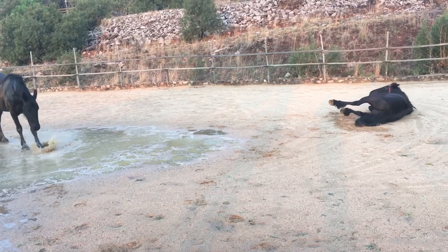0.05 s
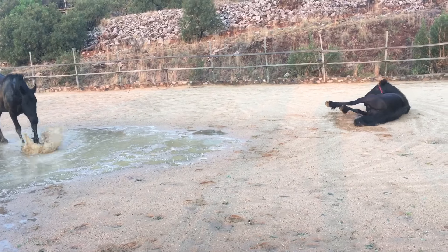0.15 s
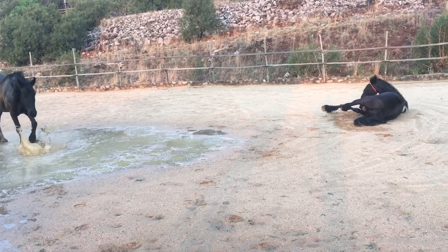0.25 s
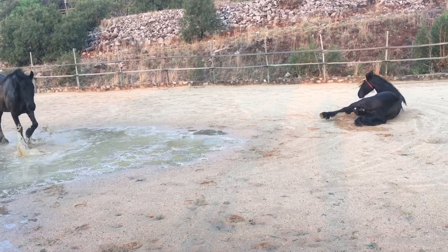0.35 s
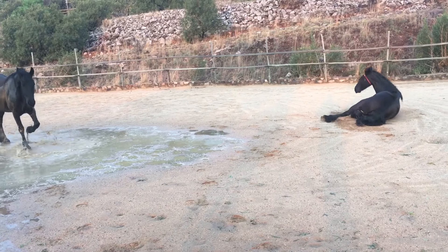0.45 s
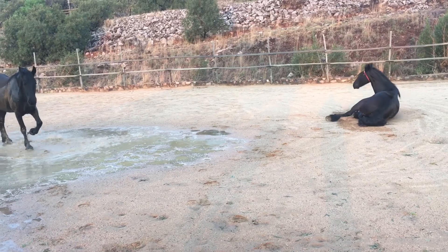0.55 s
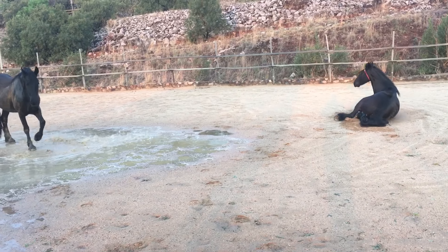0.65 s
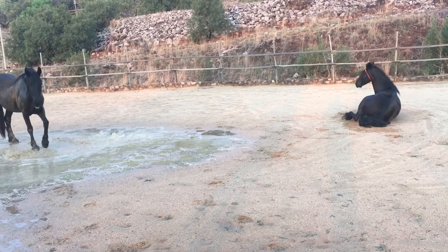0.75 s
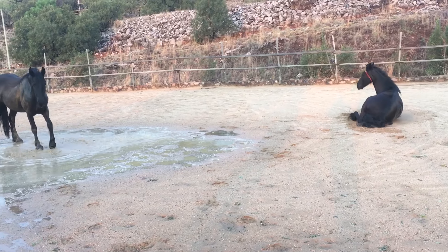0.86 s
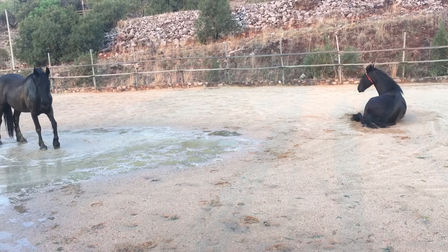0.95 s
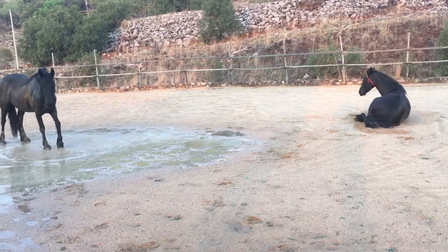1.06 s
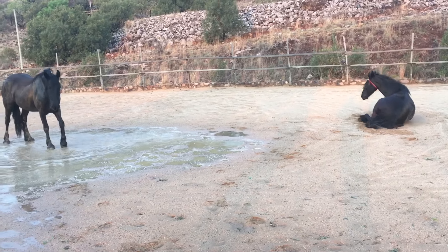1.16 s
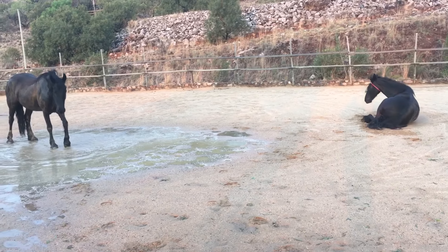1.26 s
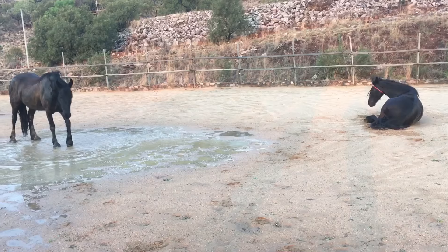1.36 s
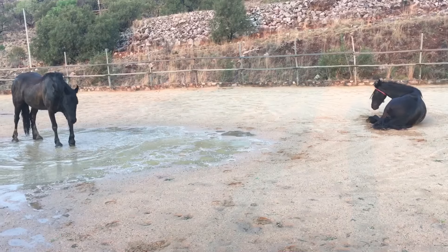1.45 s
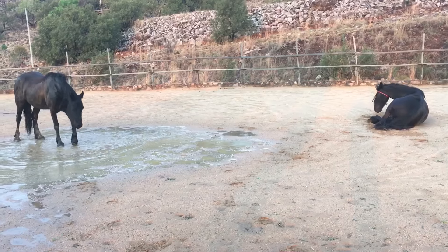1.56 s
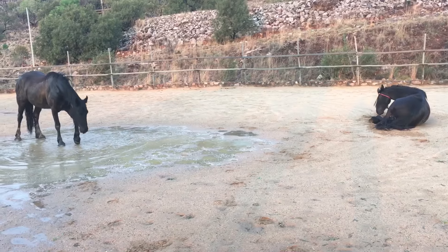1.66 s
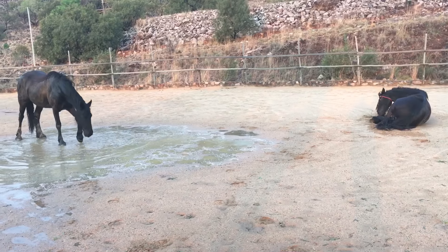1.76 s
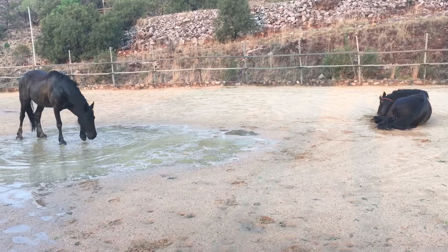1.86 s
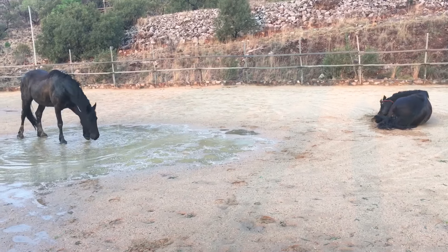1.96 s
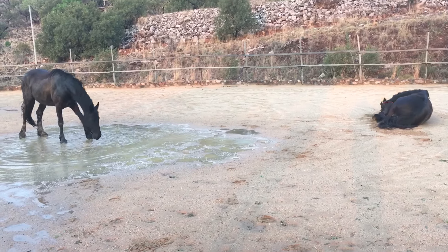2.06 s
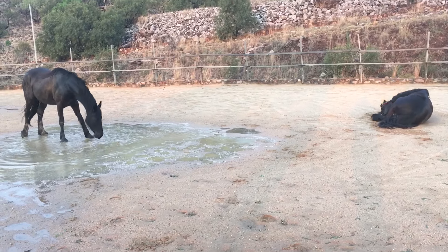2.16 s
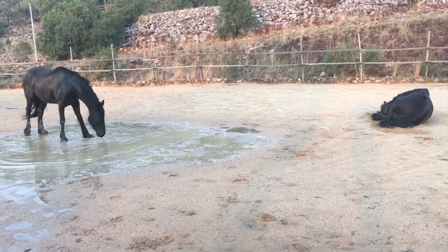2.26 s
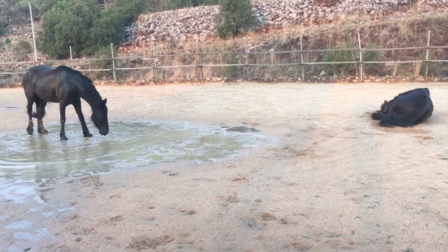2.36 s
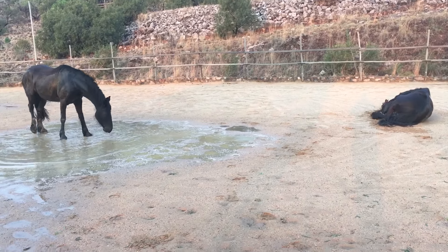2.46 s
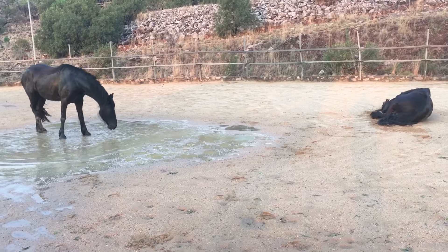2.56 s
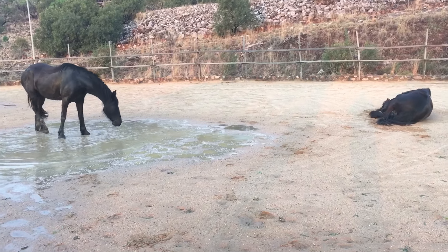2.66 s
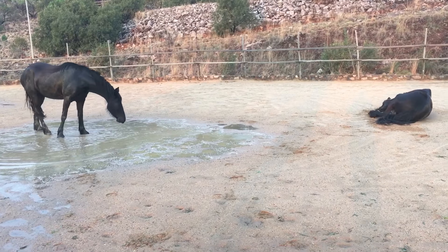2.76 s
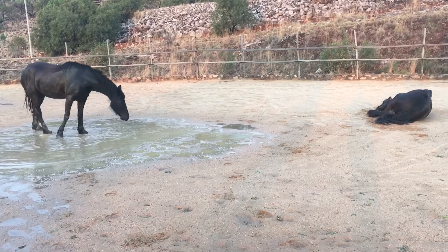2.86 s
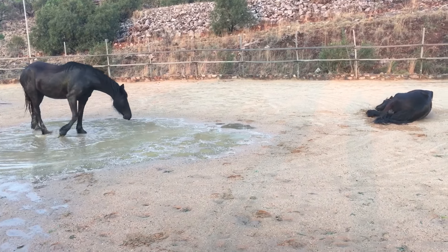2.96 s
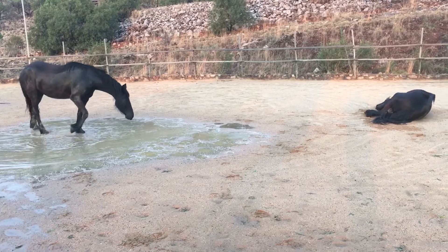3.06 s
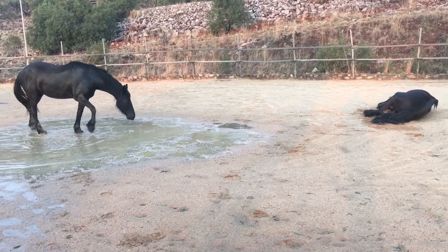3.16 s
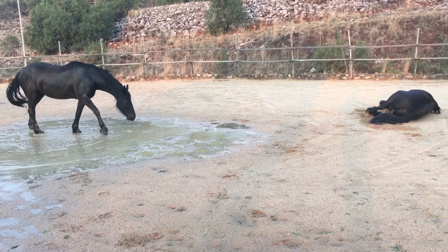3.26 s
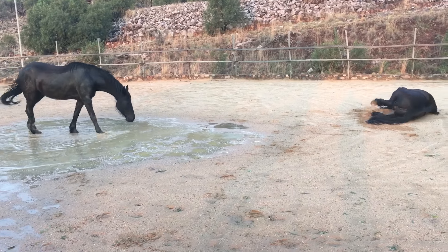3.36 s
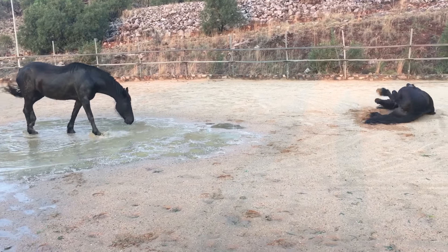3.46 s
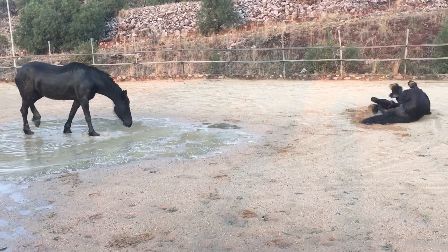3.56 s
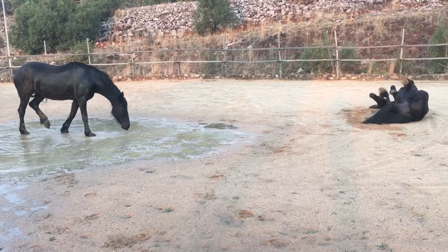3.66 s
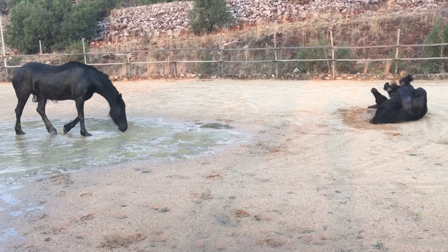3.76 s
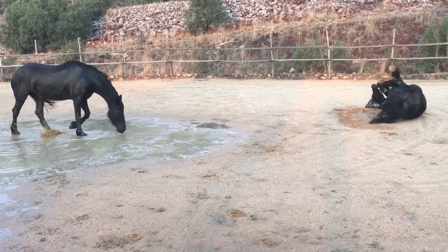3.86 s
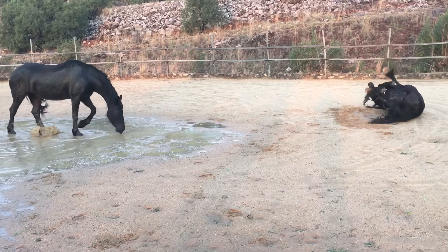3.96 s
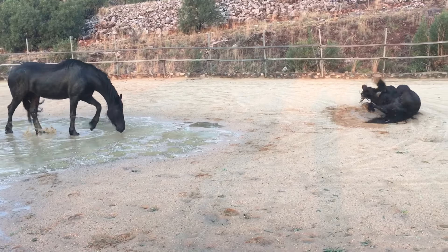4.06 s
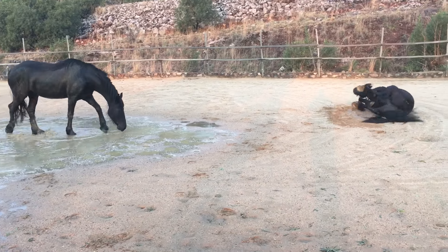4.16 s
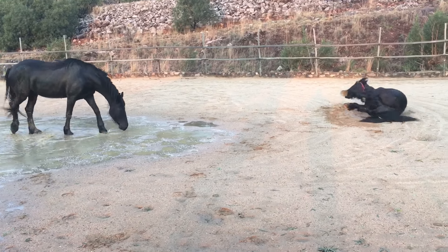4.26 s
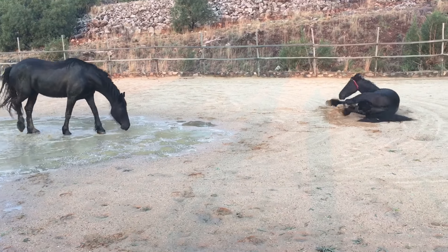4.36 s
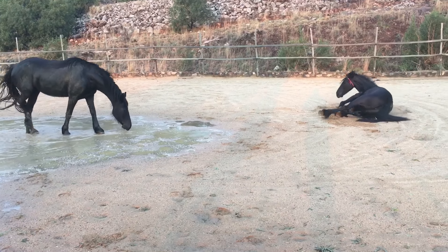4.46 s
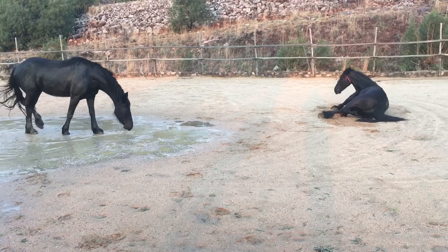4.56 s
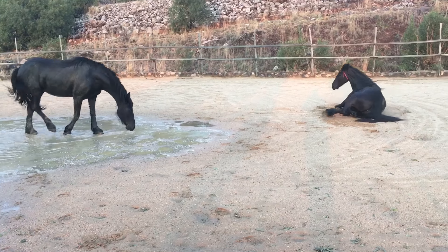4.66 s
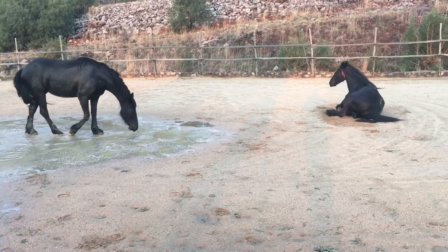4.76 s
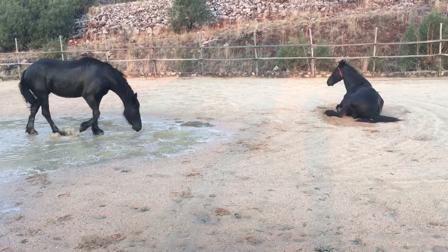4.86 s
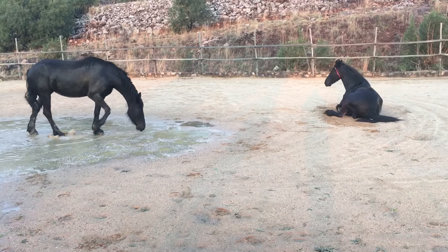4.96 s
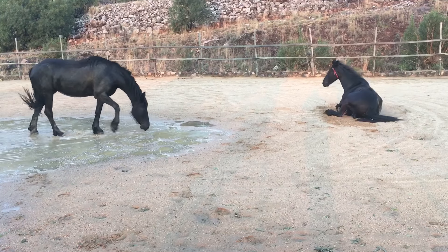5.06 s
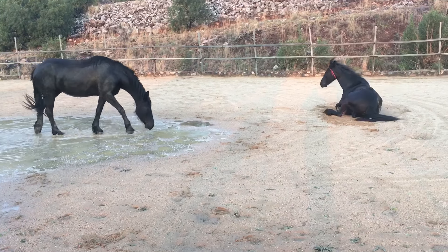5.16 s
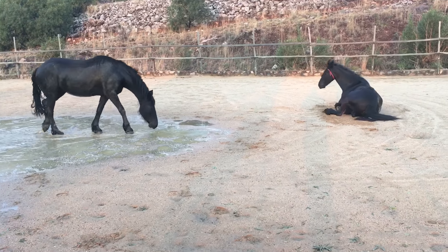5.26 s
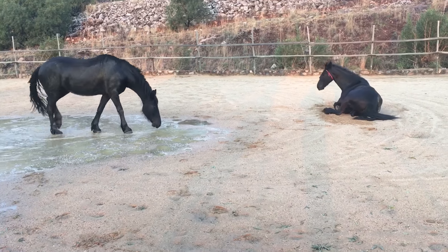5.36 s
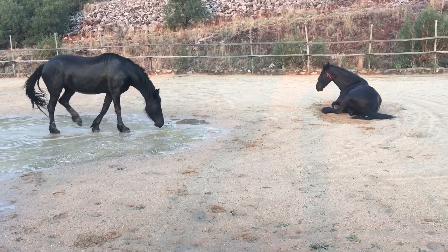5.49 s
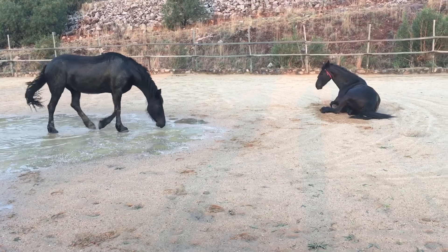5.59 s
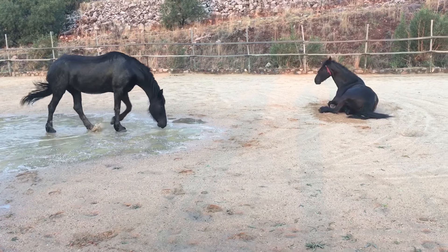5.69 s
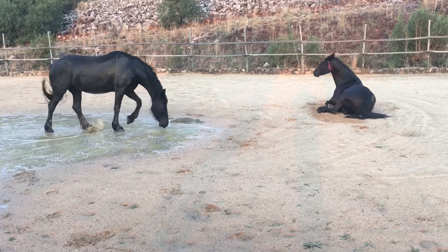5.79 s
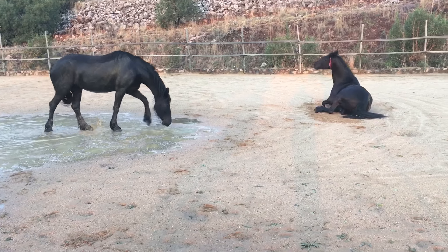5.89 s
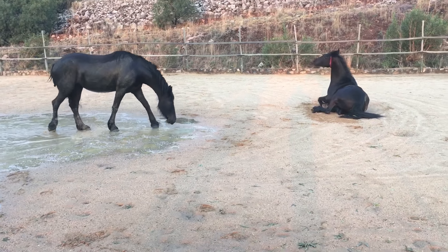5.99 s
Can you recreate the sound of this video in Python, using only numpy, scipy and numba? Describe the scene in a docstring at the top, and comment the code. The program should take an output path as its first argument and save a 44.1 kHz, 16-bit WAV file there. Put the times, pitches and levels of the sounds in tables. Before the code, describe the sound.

A sharp hoof splash in a shallow puddle opens, followed by sloshing and falling spray. The water settles to light drips as wind buffets the microphone, and a faint bird whistles once. The horse then walks on through the water in a run of uneven splashes, gurgles and ticking drops, and a stronger gust thumps. It is heard from a few metres away in the open air, over a soft hush of far leaves.

```python
"""A horse steps and paws through a shallow puddle in a sandy outdoor arena, some metres from a phone.
First a hoof slaps the water: trapped air rings as bubbles and thrown water falls back as spray.
A gust rumbles on the microphone, drips fall from legs and muzzle, and near 2.7 s a bird whistles once.
Then the hooves splash again and again, hardest near 3.9 s, and the strongest gust thumps near 5 s.
Behind it all, far leaves rustle and a faint narrow hiss comes and goes."""
import sys
import numpy as np
from scipy import signal
from scipy.fft import rfft, irfft, next_fast_len
from scipy.io import wavfile
from scipy.ndimage import uniform_filter1d
from numba import njit

SR = 44100
rng = np.random.default_rng(int(sys.argv[2]) if len(sys.argv) > 2 else 0)


def generate_wav(signal):
    """Clip the signal to [-1, 1] and save it as 16-bit WAV at the path in sys.argv[1]."""
    frames = np.transpose(np.atleast_2d(signal))
    scaled = np.clip(frames, -1, 1) * 32767
    pcm = np.round(scaled).astype(np.int16)
    wavfile.write(sys.argv[1], SR, pcm)


N = 265868

# tone of falling spray and of sloshing water: f/Hz, level/dB
SPRAY_TONE = [(1290, -40), (2200, 1), (2510, -5), (2990, -1.5), (3560, -5.5), (4000, -1), (4960, -9),
              (5440, -1), (7770, -7), (8950, -2), (10400, -10), (12600, -3), (16000, -10.5)]
SLOSH_TONE = [(240, -17), (400, 1), (458, -9.5), (546, -6.5), (1190, 1.5), (2210, -5.5), (2560, -13),
              (3000, -11.5), (3900, -15), (6600, -120)]
# how stirred the puddle is between surges: t/s, spray/dB, sloshing/dB
STIR = [(0.0, -54, -52.5), (0.4, -55, -51), (0.55, -44, -45), (0.83, -45, -47.5), (1.08, -59, -59),
        (1.16, -67, -63), (1.5, -72, -67), (1.9, -76, -65.5), (2.11, -66.5, -61.5), (2.88, -72, -63.5),
        (3.0, -65, -62.5), (3.35, -63.5, -58.5), (3.7, -57, -57), (3.88, -61, -59.5), (4.02, -56, -51),
        (4.22, -54.5, -50.5), (4.5, -56, -58), (5.2, -57.5, -57.5), (5.45, -63, -60.5), (6.03, -64, -62)]
# water thrown or pushed by a leg: peak t/s, spray/dB, sloshing/dB, swell/s, fade/s
LEG_SURGES = [(0.0, -45.5, -49.5, .1, .14), (.17, -46, -37, .015, .07), (.28, -46.5, -53, .08, 0.04),
              (.705, -48, -48, .02, .05), (.826, -46, -55, .03, .03), (2.25, -56, -58, .1, .08),
              (2.48, -60.5, -58, .04, .07), (2.945, -56, -46, .025, .07), (3.06, -65, -49.5, .06, .1),
              (3.15, -59, -56, .06, .04), (3.205, -58, -50, .04, .07), (3.45, -43, -55, .035, .025),
              (3.505, -70.5, -42, .012, .05), (3.555, -54.5, -58, .05, .12), (3.68, -57, -49, .07, 0.09),
              (3.94, -50, -45, .02, .05), (4.13, -56, -51, .08, .08), (4.26, -49.5, -58.5, .05, .08),
              (4.37, -49, -50, .06, .1), (4.57, -53, -67, .05, .1), (4.85, -56.5, -71, .2, .05),
              (4.9, -49, -48, .02, .05), (4.99, -70, -46.5, .06, .03), (5.15, -59.5, -48.5, 0.0822, .12),
              (5.33, -50.5, -57, .09, .04), (5.43, -60, -59, .03, .05), (5.84, -54.5, -54, .08, 0.08),
              (6.01, -58, -64, .08, 0.02)]


def undb(db):
    """Turn decibels into a gain."""
    return 10 ** (np.asarray(db, float) / 20)


def curve(table):
    """Join a table's points with straight lines: one value per sample for each column after time."""
    s, *columns = np.transpose(table)
    return [np.interp(np.arange(N) / SR, s, c) for c in columns]


def swells(events):
    """A gain curve per level column: events rise 10 dB per swell time, then drop 10 dB per fade time."""
    s, *levels, swell_s, fade_s = np.transpose(events)[:, :, None]
    late = np.arange(N) / SR - s
    power = 10 ** -np.maximum(late / fade_s, -late / swell_s)
    return [np.sqrt(undb(2 * db[:, 0]) @ power) for db in levels]


def colour(x, tone):
    """Shape a sound's lows and highs with a tone table; the result has average (rms) size 1."""
    hz, db = np.transpose(tone)
    size = next_fast_len(N)
    f = np.arange(1, size // 2 + 2) * SR / size
    gain = undb(np.interp(np.log(f), np.log(hz), db, left=-90, right=-90))
    y = irfft(rfft(x, size) * gain, size)[:N]
    return y / np.std(y)


def noise(tone):
    """Steady noise with the given tone."""
    return colour(rng.standard_normal(N), tone)


def wobble(per_s):
    """A smooth random wobble of typical size 1."""
    k = int(SR / per_s)
    steps = np.repeat(rng.standard_normal(N // k + 1), k)
    y = uniform_filter1d(uniform_filter1d(steps, k), k)[:N]
    return y / np.std(y)


@njit
def ring(s, gain, hz, life_s, rise, swell, hold):
    """Short tones: each grows for `swell` cycles, glides `rise` octaves and fades 60 dB over its life."""
    out = np.zeros(N)
    for k in range(len(s)):
        start, life, phase = int(s[k] * SR), life_s[k] * SR, 0.
        for i in range(min(int(life), N - start)):
            phase += min(hz[k] * 2 ** (rise[k] * i / life), .45 * SR) / SR
            fade = 1000. ** -(i / life) ** hold  # more hold, later fade
            out[start + i] += gain[k] * min(phase / swell, 1.) * fade * np.sin(2 * np.pi * phase)
    return out


def swarm(per_s, lo_hz, hi_hz, cycles, rise, spread_db, hold=1.):
    """A crowd of tiny random tones, most quiet and a few louder."""
    when, pitch, size, length = rng.random((60000, 4))[:int(per_s * N / SR)].T
    hz = lo_hz * (hi_hz / lo_hz) ** pitch
    gain = hz * undb(spread_db * np.minimum(-np.log(1 - size), 3))
    y = ring(when * N / SR, gain, hz, cycles * (.5 + length) / hz, 2 * rise * length, .475, hold)
    return y / np.std(y)


def hoof_slaps():
    """A hoof rings a pocket of air, thuds on wet ground and breaks the water with a burst and a crack."""
    # hooves and thrown water hitting the puddle: t/s, level/dB, air pocket f/Hz, thud/dB, crack/dB, fade/s
    hits = [(0.152, -26, 1100, -36, -32, 0.06), (0.158, -17, 1180, -25, -32.5, 0.0493),
            (2.907, -18, 796, -30, -31, 0.036), (2.916, -32, 1890, -45, -36, 0.035),
            (2.957, -31.5, 1207, -63, -49.5, 0.052), (2.968, -31.5, 850, -47, -51, 0.061),
            (3.447, -48, 1520, -67, -33, 0.035), (3.5, -31, 1000, -65.5, -58, 0.1),
            (3.674, -30.5, 1849, -51.5, -46, 0.0584), (3.9312, -7, 1480, -36, -24, 0.031),
            (3.934, -21, 960, -38, -33, 0.06), (4.342, -38.5, 1408, -59.5, -40, 0.078),
            (4.362, -42, 1700, -55, -43.5, 0.187), (4.88, -29, 1216, -43, -30.5, 0.1),
            (4.903, -33, 1907, -47, -41, 0.06), (5.149, -35.5, 836, -50.5, -45.5, 0.059),
            (5.777, -21.5, 1288, -64, -27.5, 0.0741), (5.781, -26, 2150, -60, -36, 0.09)]
    # low tones of the wet ground: f/Hz, level/dB, life/s
    ground_tones = [(318.7, 8.5, 0.02946), (549, -12, 0.0536)]
    s, db, hz, thud_db, crack_db, fade_s = np.transpose(hits)
    each = np.ones(len(s))
    tones = ring(s, undb(db), hz, .381 * fade_s, rise=.152 * each, swell=1.68, hold=.855)
    for tone_hz, tone_db, life_s in ground_tones:
        gain = np.sqrt(2) * undb(thud_db + tone_db)
        tones += ring(s + .002675, gain, tone_hz * each, life_s * each, -.1 * each, swell=.353, hold=.789)
    burst, crack = np.zeros((2, N))
    t = np.arange(SR // 4) / SR
    for at, burst_gain, crack_gain, tail in zip((s * SR).astype(int), undb(db - 12), undb(crack_db), fade_s):
        fade = 1000. ** -(t / tail) ** 1.085
        burst[at:at + len(t)] += (burst_gain * np.minimum(t / .00174, 1) * fade)[:N - at]
        # the sheet of water tears a moment after the blow
        crack[at:at + len(t)] += (crack_gain * np.minimum(t / .003, 1) * fade ** 1.1)[:N - at]
    ragged = colour(swarm(5000, 600, 4000, cycles=5, rise=.15, spread_db=3), SLOSH_TONE)
    bright = colour(swarm(9000, 2200, 16000, cycles=8, rise=0, spread_db=2), SPRAY_TONE)
    return tones + burst * ragged + crack * bright


def bubbles():
    """Trapped air, set off by a small spatter, rings and rises in pitch as it nears the surface."""
    # single bubbles: t/s, level/dB, starting f/Hz, life/ms
    singles = [(.168, -29, 270, 18), (0.184, -36, 900, 16), (0.198, -37, 830, 16), (0.221, -44, 1050, 30),
               (0.26, -41, 1400, 25), (0.286, -41, 1000, 9), (.29, -39, 800, 12), (.342, -41, 720, 18),
               (0.697, -42, 2870, 11), (.729, -41, 1880, 23), (0.844, -42, 1400, 8), (.859, -43, 1960, 20),
               (.927, -32.5, 775, 13), (1.444, -48.5, 1156, 34), (2.289, -52, 3200, 11),
               (2.378, -46, 1010, 11), (2.423, -46.5, 1517, 17), (2.484, -42, 1570, 5),
               (3.097, -39, 1270, 13), (3.1, -44.5, 464, 25), (3.16, -48, 1126, 22),
               (3.208, -42.5, 1515, 20), (3.54, -45, 1390, 14), (3.552, -47.5, 960, 16),
               (3.652, -46, 760, 22), (4.237, -42, 1009, 20), (4.468, -46.5, 1086, 26),
               (4.939, -39, 800, 15), (4.999, -40, 1234, 24), (5.059, -43, 1036, 26),
               (5.245, -43.5, 1305, 20), (5.651, -47.5, 3755, 6), (5.688, -52.5, 3000, 7),
               (5.807, -41, 1645, 20)]
    # drips from legs and muzzle, whose bubbles chirp upward: t/s, level/dB, starting f/Hz, rise/octaves
    drips = [(.711, -41, 1250, .5), (.817, -43, 1740, .7), (1.157, -56, 850, 1.34), (1.206, -55, 976, 1.1),
             (1.239, -56, 1340, 1.24), (1.458, -60, 1410, 1.1), (1.792, -52, 900, 2.0),
             (1.864, -53, 780, 2.1), (1.98, -57, 588, 1.9), (1.999, -57, 756, 1.35), (2.035, -56, 880, 1.9),
             (3.052, -48, 786, .9), (3.464, -47, 1622, 0.82), (5.15, -37.5, 702.5, 1.34),
             (5.165, -43, 950, .6), (5.195, -50, 700, .8)]
    s, db, hz, ms = np.transpose(singles)
    plops = ring(s, undb(db), hz, ms / 1000, rise=np.full_like(s, .27), swell=1.4, hold=2.02)
    drip_s, drip_db, drip_hz, rise = np.transpose(drips)
    life_s = .031 * np.minimum((1.4 / rise) ** 1.4, 1)  # steep chirps die sooner
    chirps = ring(drip_s, undb(drip_db), drip_hz, life_s, rise, swell=1.17, hold=2.8)
    out = (plops + chirps) * undb(2.6 * wobble(300))
    # the spatter: two quieter, higher ticks for every bubble and drip
    s, db, hz = np.r_[s, drip_s], np.r_[db, drip_db], np.r_[hz, drip_hz]
    chance = rng.random((4, len(s)))
    for delay_s, ratio in zip(.0038 * chance[:2], 1.336 + 2.814 * chance[2:]):
        out += ring(s + delay_s, undb(db - 9), hz * ratio, 7 / hz, np.full_like(s, .33), swell=.56, hold=1.)
    return out


def drops():
    """Single drops land with a high ping and a lower, falling click."""
    # t/s, level/dB, ping f/Hz
    landings = [(0.2413, -26.5, 4350), (0.4812, -14, 12500), (0.6975, -19, 12200), (1.016, -32.5, 9930),
                (1.077, -29.5, 10940), (1.1188, -35.5, 9260), (2.331, -44, 5500), (2.378, -44, 4000),
                (2.4872, -39, 7000), (2.5118, -37, 9520), (2.865, -44, 9000), (2.903, -40, 6000),
                (3.0744, -46, 5000), (3.1085, -27, 13100), (3.1561, -35, 5950), (3.257, -43.5, 4470),
                (3.3942, -36, 9520), (3.418, -31, 6400), (3.5, -26, 12800), (4.0354, -36, 5430),
                (4.12, -37, 6760), (4.251, -39.5, 4120), (4.2746, -25, 6660), (4.45, -33, 8500),
                (4.649, -36, 8830), (5.006, -36, 8000), (5.125, -33, 7870), (5.2086, -34, 5410),
                (5.45, -34, 5700), (5.515, -41, 5510), (5.5438, -37, 5670), (5.597, -41, 5000),
                (5.639, -45, 4460), (6.003, -29.5, 9370)]
    s, db, hz = np.transpose(landings)
    ping = ring(s, undb(db), hz, 12 / hz, rise=np.zeros_like(s), swell=.8, hold=.945)
    click = ring(s, undb(db - 9), .45 * hz, 8 / hz, rise=np.full_like(s, -1.5), swell=.3, hold=1.)
    return ping + click


def spray_and_slosh():
    """Spray is fine drops and sparse ticks over a hiss; sloshing is many small bubbles over a wash."""
    spray_gain, slosh_gain = np.hypot(undb(curve(STIR)), swells(LEG_SURGES))
    fine = undb(-3) * swarm(1200, 2200, 16000, cycles=22, rise=.1, spread_db=3.3)
    ticks = undb(-13) * swarm(40, 3000, 10000, cycles=6, rise=0, spread_db=3)
    spray = colour(fine + ticks + rng.standard_normal(N), SPRAY_TONE)
    gurgle = swarm(800, 439.6, 3101, cycles=14.67, rise=.578, spread_db=3.02, hold=1.68)
    slosh = undb(-4) * (colour(gurgle, SLOSH_TONE) + undb(-2.5) * noise(SLOSH_TONE))
    patter = wobble(60)  # drops arrive in bunches
    spray *= spray_gain * undb(1.55 * patter + .997 * wobble(25))
    slosh *= slosh_gain * undb(1.47 * patter + .93 * wobble(25.23))
    return spray + slosh


def mist():
    """The finest spray makes puffs of bright hiss."""
    # peak t/s, level/dB, swell/s, fade/s
    puffs = [(1.15, -62, .1, .3), (2.25, -55, .08, .07), (3.555, -50, .05, .06), (5.31, -55, .06, .05)]
    highs_only = signal.butter(2, 7000, "high", fs=SR, output="sos")
    return signal.sosfilt(highs_only, noise(SPRAY_TONE)) * swells(puffs)[0]


def wind():
    """Air hits the microphone opening: a deep rumble, a lighter flutter and a few thumps."""
    # wind between gusts: t/s, rumble/dB, flutter/dB
    breeze = [(0, -43, -42), (.3, -45, -45.5), (.55, -48, -49), (1.05, -42, -51.5), (1.7, -44, -54.5),
              (2.2, -42, -52), (2.5, -41, -44), (3.26, -46.5, -44), (3.6, -42.5, -43), (4.26, -50, -54),
              (4.6, -41, -54.5), (5.2, -43, -50.5), (5.78, -42.5, -47.5), (6.03, -51, -56)]
    # peak t/s, rumble/dB, flutter/dB, swell/s, fade/s
    gusts = [(1.26, -32.5, -47, .1, .28), (4.96, -30, -41.5, .08, .13), (5.2, -43, -47, .1, .1)]
    # tone of the rumble and of the flutter: f/Hz, level/dB
    rumble_tone = [(12, -28.5), (20, -13), (45, -4.5), (60, 3.5), (76, -0.5), (115, -8.5), (150, -35),
                   (250, -120)]
    flutter_tone = [(59, -35.5), (100, -3), (232, -22.5), (260, -34.5), (340, -38), (570, -120)]
    # thumping puffs of air: t/s, level/dB, starting f/Hz, life/s
    puffs = [(4.967, -26, 110, .04), (4.98, -17, 95, .06), (5.008, -26, 100, .05)]
    deep, light = np.hypot(undb(curve(breeze)), swells(gusts))
    rumble = noise(rumble_tone) * deep * undb(.5 * wobble(5.4))
    flutter = noise(flutter_tone) * light * undb(2.33 * wobble(24.95))
    s, db, hz, life_s = np.transpose(puffs)
    thumps = -ring(s, undb(db), hz, life_s, rise=np.full_like(s, -1.6), swell=.25, hold=1.5)
    return rumble + flutter + thumps


def bird():
    """One falling whistle: a pure tone whose loudness wavers a little."""
    # t/s, f/Hz, level/dB
    whistle = [(2.625, 2440, -76.5), (2.651, 2475, -59), (2.717, 2367, -52.5), (2.75, 2359, -62),
               (2.829, 2332, -68), (2.85, 2350, -80)]
    hz, db = curve(whistle)
    t = np.arange(N) / SR
    sings = (t > whistle[0][0]) & (t < whistle[-1][0])
    tone = np.sqrt(2) * np.sin(2 * np.pi * np.cumsum(hz) / SR)
    return sings * undb(db + .7 * wobble(50)) * tone


def far_leaves():
    """Distant leaves blend into a soft, nearly steady hush."""
    # f/Hz, level/dB
    hush_tone = [(130, -41), (220, -4.5), (315, -3.5), (459, -10), (601, -13.5), (700, -13), (1000, -30),
                 (12700, -35), (16000, -29)]
    return noise(hush_tone) * undb(-61 + .23 * wobble(5.94))


def faint_hiss():
    """Noise narrowed around one pitch comes and goes."""
    # peak t/s, level/dB, swell/s, fade/s
    rises = [(1.0, -63, .6, .3), (1.27, -66, .3, .07), (3.22, -68, .04, .3), (3.42, -61, .3, .04),
             (5.55, -66, .3, .6), (6.03, -65, .5, .1)]
    centre_hz, width_hz = 1569, 306
    b, a = signal.iirpeak(centre_hz, centre_hz / width_hz, fs=SR)
    hiss = signal.lfilter(b, a, signal.lfilter(b, a, rng.standard_normal(N)))
    return hiss / np.std(hiss) * swells(rises)[0]


def scene():
    """The puddle and its background, added up at one microphone."""
    puddle = hoof_slaps() + bubbles() + drops() + spray_and_slosh() + mist()
    return (puddle + wind() + bird() + far_leaves() + faint_hiss())[None]


def record(dry):
    """The phone cuts off the highest treble."""
    top_hz = 15900
    return signal.sosfilt(signal.ellip(10, .2, 70, top_hz, fs=SR, output="sos"), dry)


dry = scene()
out = record(dry)
generate_wav(out)
```